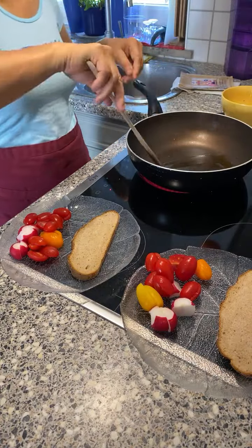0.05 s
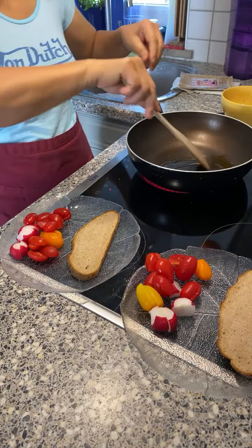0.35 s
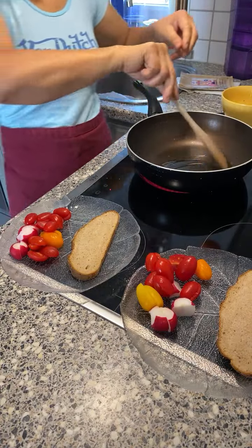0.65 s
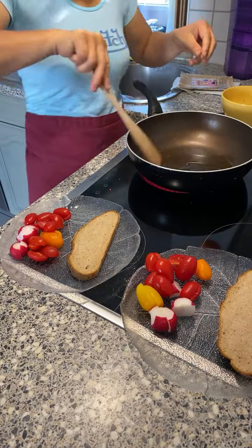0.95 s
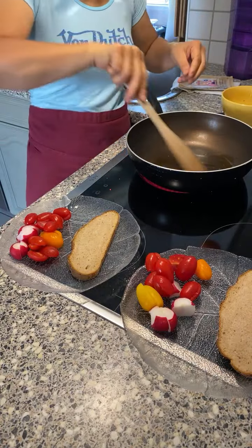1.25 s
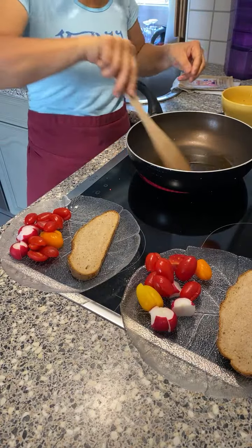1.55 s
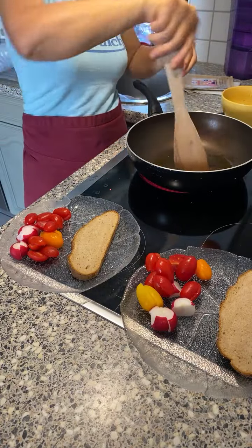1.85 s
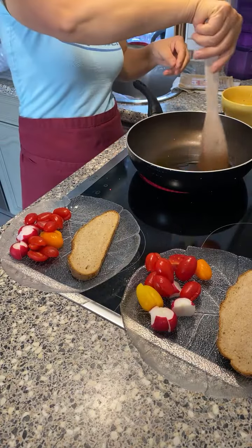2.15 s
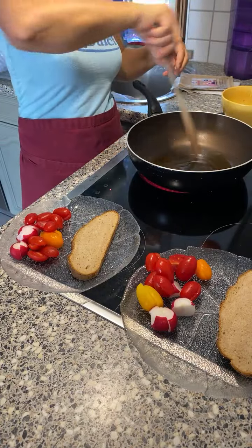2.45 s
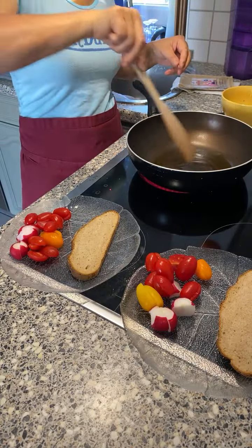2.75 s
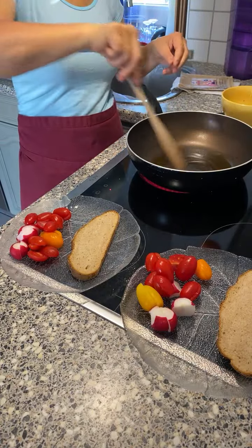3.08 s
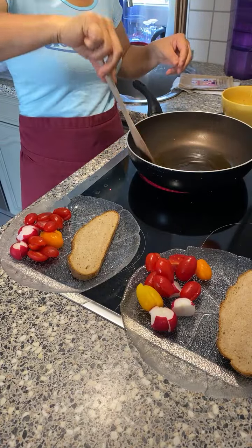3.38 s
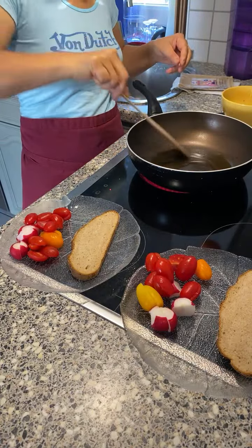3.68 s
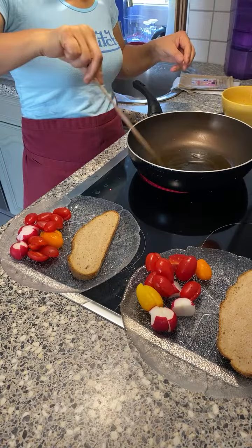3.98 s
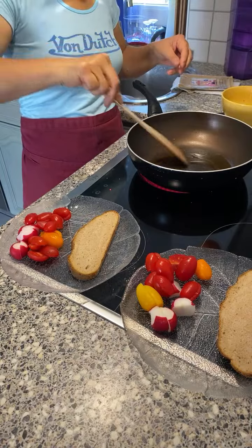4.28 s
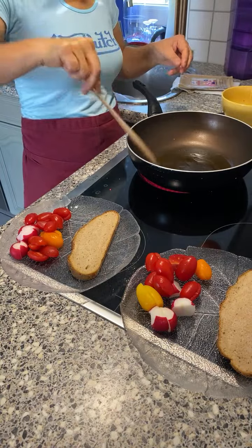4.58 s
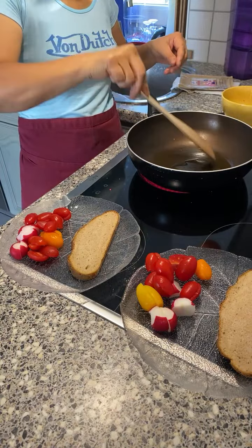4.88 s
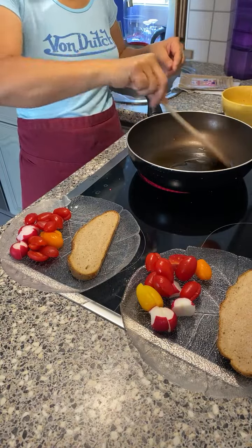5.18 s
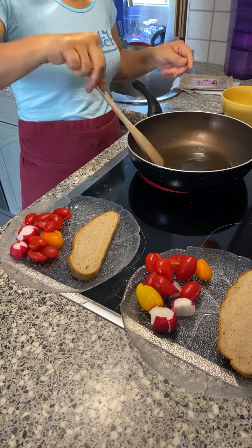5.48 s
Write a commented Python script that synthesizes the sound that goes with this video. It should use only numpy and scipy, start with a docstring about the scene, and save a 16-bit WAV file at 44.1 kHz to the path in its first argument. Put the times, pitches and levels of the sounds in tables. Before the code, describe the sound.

Uneven dry scrapes and occasional taps of a wooden spatula in a frying pan, over a faint appliance hum.

```python
"""A wooden spatula scrapes in strokes over an oiled frying pan, on a glass hob in a small tiled kitchen.
Stick-slip friction makes the rasp and drives the pan's modes; when the blade knocks down, the impact
rings the same modes. Now and then the edge half sticks and squeaks. Reflections from pan, hob and tiles
colour these sounds, and an appliance hums faintly behind them. All is heard in mono."""
import sys
import numpy as np
from scipy import signal
from scipy.fft import rfft, irfft, next_fast_len
from scipy.io import wavfile
from scipy.ndimage import map_coordinates

SR = 44100
rng = np.random.default_rng(int(sys.argv[2]) if len(sys.argv) > 2 else 0)


def generate_wav(sig):
    """Save sig (samples, or channels by samples) to the path in sys.argv[1] as 16-bit PCM at SR."""
    pcm = np.round(np.clip(np.atleast_2d(sig).T, -1, 1) * 32767).astype(np.int16)
    wavfile.write(sys.argv[1], SR, pcm)


N = 243873


def amp(db):
    """Amplitude ratio of a level in decibels."""
    return 10 ** (np.asarray(db) / 20)


def unit(x):
    """Normalisation to rms 1."""
    return x / np.sqrt(np.mean(x ** 2) + 1e-20)


def along(points, hz):
    """Interpolation of (frequency_hz, value) points on a logarithmic frequency axis."""
    f, v = np.transpose(points)
    return np.interp(np.log(hz + 1), np.log(f + 1), v)


def wobble(rate_hz):
    """Random modulation: a spline through rate_hz Gaussian values a second."""
    at = np.arange(N) * rate_hz / SR
    coarse = at[::20]
    return np.interp(at, coarse, map_coordinates(rng.standard_normal(int(at[-1]) + 2), [coarse]))


def filtered(x, response):
    """Linear filtering: the spectrum of x times a complex frequency response."""
    n = x.shape[-1]
    m = next_fast_len(n + SR // 10)
    return irfft(rfft(x, m) * response(np.fft.rfftfreq(m, 1 / SR)), m)[..., :n]


def coloured(x, spectrum):
    """Spectral shaping of x by (frequency_hz, gain_db) points, at rms 1."""
    return unit(filtered(x, lambda hz: amp(along(spectrum, hz))))


def lowpass(hz, edge_hz):
    """Response of a causal two-pole low-pass."""
    return 1 / (1 + np.sqrt(2) * 1j * hz / edge_hz - (hz / edge_hz) ** 2)


def add(track, start_s, x):
    """Superposition of x on the track from start_s on."""
    part = track[max(round(start_s * SR), 0):][:len(x)]
    part += x[:len(part)]


# Spectrum of the still kitchen: frequency_hz, relative_density_db
AIR_SPECTRUM = [(18, -52), (30, -29), (69, -4), (111, -4), (160, -4.5), (292, -9.5), (341, -9.5),
                (830, -15.5), (1440, -20.5), (15500, -35.5)]


def background(hum_hz=99.2, hum_db=-71, air_db=-67.5):
    """Ambient noise and an appliance's hum, a tone slightly modulated in phase and amplitude."""
    phase = 2 * np.pi * hum_hz * np.arange(N) / SR + .5 * wobble(5.2)
    hum = amp(hum_db + 2.0 * wobble(4.7)) * np.sqrt(2) * np.sin(phase)
    return hum + amp(air_db) * coloured(rng.standard_normal(N), AIR_SPECTRUM)


# Reverberation time of the kitchen: frequency_hz, t60_s
KITCHEN_DECAY = [(90, 0.58), (260, 0.15), (800, 0.27), (2000, 0.3), (6000, 0.26), (14000, 0.21)]


def in_kitchen(x, wet_db, early_db, early_t60_s=0.097, glance_db=-13):
    """Convolution with a fresh impulse response: direct sound, echoes off pan, hob and tiles, a tail."""
    hz, t, noise = signal.stft(rng.standard_normal(SR * 3 // 4), SR, nperseg=256)
    decay = amp(-60 * t / along(KITCHEN_DECAY, hz)[:, None])
    tail = signal.istft(noise * decay, SR, nperseg=256)[1]
    t = np.arange(len(tail)) / SR
    tail *= 1 - np.exp(-t / 0.014)
    early = rng.standard_normal(len(t)) * amp(-60 * t / early_t60_s) * (t > .002)
    response = amp(wet_db) * tail / np.linalg.norm(tail) + amp(early_db) * early / np.linalg.norm(early)
    response[0] += 1
    response /= np.linalg.norm(response)
    # only short waves glance off the pan's wall, combing the treble
    for delay_s in rng.uniform(.0006, .004, size=4):
        add(response, delay_s, amp(glance_db) * np.array([1, -1]))
    return signal.fftconvolve(x, response)


# Whistles of the half-sticking edge: middle_s, length_s, pitch_hz, relative_level_db
EDGE_SQUEAKS = [(0.813, 0.083, 4400, -55.5), (0.947, 0.16, 4470, -53), (1.147, .07, 5230, -58),
                (1.332, .08, 4950, -54), (1.541, 0.059, 4260, -52), (3.556, 0.12, 4120, -59.5)]


def squeaks(gain_db, width_hz, sag):
    """Stick-slip oscillation: hoarse narrow-band tones that sink a little as the blade slows."""
    out = np.zeros(N)
    for middle_s, length_s, pitch_hz, level_db in EDGE_SQUEAKS:
        u = np.linspace(-1, 1, int(length_s * SR))
        phase = 2 * np.pi * np.cumsum(pitch_hz * (1 - sag * u)) / SR
        hoarse = filtered(rng.standard_normal((2, len(u))), lambda hz: lowpass(hz, width_hz / 2))
        tone = unit(hoarse[0] * np.sin(phase) + hoarse[1] * np.cos(phase))
        add(out, middle_s - length_s / 2, amp(level_db + gain_db) * np.cos(np.pi / 2 * u) * tone)
    return in_kitchen(out, wet_db=-27.0, early_db=-5)[:N]


def resonate(force, hz, width_hz):
    """Resonance of one mode, a damped harmonic oscillator."""
    return signal.lfilter(*signal.iirpeak(hz, hz / width_hz, fs=SR), force)


# Range of modes in which each part moves: from_hz, to_hz
HOB, BODY, BOTTOM, WALL, RIM = (0, 110), (110, 660), (660, 1450), (1450, 2000), (2000, 7000)
# Modes of the pan standing on the hob: frequency_hz, bandwidth_hz, relative_level_db
PAN_MODES = [(83.2, 6, 3), (135.3, 9.2, 8), (196.6, 46, -4), (314.6, 26, 5), (374.4, 53, 6),
             (448.3, 54, 3.5), (577, 96, -1), (734.6, 6.6, 0.5), (836.4, 45.5, 4.5), (1091, 58, -4.5),
             (1315, 310, -6), (1567, 18, -1), (1665, 45, 9.5), (1813, 79, 3.5), (2540, 60, -3.5),
             (2906, 276, 10.5), (2760, 55, -16), (4080, 67, 4), (7000, 18, -14)]


def struck_pan(force, thump_db, bottom_db):
    """Modal superposition: the point of contact sets how strongly, and in what sign, modes are driven."""
    ring = np.zeros(len(force))
    for hz, width_hz, db in PAN_MODES:
        coupling_db = thump_db * (hz < HOB[1]) + bottom_db * (BOTTOM[0] < hz < BOTTOM[1])
        ring += rng.choice([-1, 1]) * amp(db + coupling_db) * resonate(force, hz, width_hz)
    return ring


def rubbed_pan(force, part, drift_db):
    """Forced vibration of one part; each mode waxes and wanes at random as the blade crosses its nodes."""
    modes = [amp(db + drift_db * wobble(9.7)) * resonate(force, hz, width_hz)
             for hz, width_hz, db in PAN_MODES if part[0] < hz < part[1]]
    return unit(signal.lfilter(*signal.butter(2, part[1], fs=SR), sum(modes)))


# Spectrum of wood rubbing on the coating: frequency_hz, relative_density_db
RASP_SPECTRUM = [(200, -20.5), (600, 5.5), (1400, -3), (2100, 5), (2800, -6.5), (3400, 1.5), (4350, 3),
                 (5300, -0.5), (7000, -3.5), (9000, -13), (16000, -25)]


def wood_rasp(force):
    """Source and filter: a broadband force takes on the colour of wood on the coating."""
    return coloured(force, RASP_SPECTRUM)


# Landings of the blade: start_s, relative_level_db, contact_s, crack_db, hob_thump_db, bottom_ring_db
BLADE_KNOCKS = [(.502, -54.5, 0.00069, -7, 0, 1), (1.927, -37.5, 0.00087, -14, -8, -4),
                (1.981, -40, 0.00084, -14, -10, -3.5), (2.965, -36, 0.0016, -26.5, 0.5, 3),
                (3.022, -43.5, 0.00072, -2, -11, 1), (3.410, -41, 0.00066, -10.5, 0.5, 0),
                (4.070, -36.5, 0.00046, -14, 0.5, -2), (4.080, -44, 0.0004, -13, -4, 11),
                (4.559, -40, 0.00057, -12, -4, 3), (4.621, -44.5, 0.00017, 0.5, 10.5, -16),
                (5.148, -31, 0.00068, -12.5, 3, 6), (5.23, -36.5, 0.00039, -6, 7.5, 5)]


def knocks(gain_db, crack_t60_s, spread_s):
    """Impact: a half-sine push rings the pan, duller the longer the contact, with a gritty crack."""
    out, t = np.zeros(N), np.arange(SR // 2) / SR
    for start_s, level_db, contact_s, crack_db, thump_db, bottom_db in BLADE_KNOCKS:
        push = np.sin(np.pi * t / contact_s) * (t < contact_s)
        ring = struck_pan(push, thump_db, bottom_db)
        ring *= 1 - np.exp(-t / spread_s)  # bending waves take a moment to spread through the pan
        ring /= np.std(ring[:SR // 50])  # rms 1 over the first 20 ms
        crack = wood_rasp(rng.standard_normal(len(t))) * amp(crack_db - 60 * t / crack_t60_s)
        add(out, start_s, amp(level_db + gain_db) * in_kitchen(ring + crack, wet_db=4.0, early_db=1.0))
    return out


def friction(chatter_db, slip_rate_hz=14000):
    """Stick-slip force: wood fibres catch and let go in dense, tiny impulses that come in clumps."""
    slips = rng.random(N) < slip_rate_hz / SR
    impulses = slips * rng.standard_normal(N)
    clumping = amp(chatter_db * (wobble(170) + 1.46 * wobble(45)))
    return unit(impulses * clumping)


# How each layer follows a stroke: speed_power, slowing_power, change_over_stroke_db (its swell or fade),
# outward_db (a further change as the blade heads for the wall)
LAYER_LAWS = {"rasp": (0.92, 1.15, 5, -1), "sheen": (1.3, 1.15, 1.5, -16), "bottom": (1.4, 0.73, 7.2, 8.7),
              "wall": (0.98, 0.95, 4, 19.5), "judder": (0.25, 0.52, -3, 14.5)}
# Pushes of the blade: start_s, rise_s, hold_s, fall_s, heading (-1 to the centre, 1 to the wall),
# relative_level_db, then offsets from that level: sheen_db, bottom_db, wall_db, judder_db
BLADE_STROKES = [ (0.0, 0.0016, 0.02, 0.12, 0, -55.5, -16, -6, 7, -3.5),
                 (0.082, 0.1, 0.0091, .19, -0.46, -55.5, -12.5, -4, -4, -6),
                 (0.502, 0.018, 0.096, 0.16, -0.63, -75, -8, -7, -3, 4),
                 (0.71, 0.13, 0.16, 0.11, 0.62, -52.5, -14.5, -25, 0, -10.5),
                 (1.029, 0.1, 0.086, 0.07, 1, -55, -13.5, -1, -9.5, .5),
                 (1.254, 0.066, 0.098, 0.091, 1, -52, -12, -3.5, -2, -8),
                 (1.482, 0.064, 0.034, .16, 0.23, -50.5, -14.5, -6, -7, -3),
                 (1.96, 0.029, 0.31, 0.093, 0.3, -65.5, -16, 9, 0, 13.5),
                 (2.13, 0.23, 0.17, 0.21, .7, -49, -10.5, -11, -9.5, -9),
                 (3.019, .064, 0.0088, 0.14, -0.056, -50, -17.5, -14, -5.5, -7),
                 (3.419, 0.19, 0.063, 0.16, 0.14, -56, -8, -11, -5, -2.5),
                 (4.127, 0.11, 0.023, 0.15, .1, -53, -14.5, -4.5, -6, -5.5),
                 (4.413, 0.077, 0.13, 0.062, -0.68, -73, -12, 0, -5, 1),
                 (4.62, 0.022, 0.055, .216, -0.72, -51.5, -11.5, -2, -8.5, -7.5),
                 (5.23, .003, 0.13, 0.14, -0.72, -51.5, -14, -6, -3.5, -6.5), ]


def stroke_gains(bite_s=0.00099, lean_s=0.026, bite_speed=0.1, push_power=1.15, slow_power=1.42):
    """Power laws tie each layer's amplitude to sliding speed; near the wall, more ring and less hiss."""
    gains = np.zeros((5, N))
    for start_s, rise_s, hold_s, fall_s, heading, stroke_db, *offsets_db in BLADE_STROKES:
        t = np.arange(int((rise_s + hold_s + 2 * fall_s) * SR)) / SR
        speed = bite_speed + (1 - bite_speed) * np.minimum(t / rise_s, 1) ** push_power  # full speed is 1
        slowing = amp(-25.5 * (np.maximum(t - rise_s - hold_s, 0) / fall_s) ** slow_power)
        progress = np.minimum(t / (rise_s + hold_s + fall_s), 1) - .5
        for gain, offset_db, layer in zip(gains, [0, *offsets_db], LAYER_LAWS):
            speed_power, slowing_power, change_over_stroke_db, outward_db = LAYER_LAWS[layer]
            # the blade bites at once, but judder builds only as the hand leans on it
            contact = np.minimum(t / (lean_s if layer == "judder" else bite_s), 1)
            level_db = stroke_db + offset_db + (change_over_stroke_db + heading * outward_db) * progress
            add(gain, start_s, contact * speed ** speed_power * slowing ** slowing_power * amp(level_db))
    return gains


# Spectrum of the blade's high hiss: frequency_hz, relative_density_db
SHEEN_SPECTRUM = [(4000, -28), (7500, -3), (9500, -4.5), (12000, -10.5), (16000, -17.5)]


def scraping(rasp_db, sheen_db, bottom_db, wall_db, rim_db, judder_db, drift_db):
    """Sliding friction hisses at the blade, rings bottom, wall and rim, and shakes the whole pan."""
    rasp, sheen, bottom, wall, judder = stroke_gains()
    force = friction(chatter_db=0.94)
    direct = amp(rasp_db) * rasp * wood_rasp(force)
    direct += amp(sheen_db) * sheen * coloured(friction(chatter_db=0.6), SHEEN_SPECTRUM)
    direct += amp(judder_db) * judder * rubbed_pan(force, BODY, drift_db)
    direct += amp(bottom_db) * bottom * rubbed_pan(force, BOTTOM, drift_db)
    direct += amp(wall_db) * wall * rubbed_pan(force, WALL, drift_db)
    direct += amp(rim_db) * np.sqrt(wall * rasp) * rubbed_pan(force, RIM, drift_db)
    # the echoes change as the blade travels round the pan: crossfade to new ones every 0.2 s
    out, hop = np.zeros(N), SR // 5
    for centre in range(0, N + hop, hop):
        at = np.arange(max(centre - hop, 0), min(centre + hop, N))
        piece = direct[at] * np.cos(np.pi / 2 * (at - centre) / hop)
        add(out, at[0] / SR, in_kitchen(piece, wet_db=-6.5, early_db=-4.0))
    return out


def scene():
    """Superposition of all sources, the same in both channels."""
    mix = scraping(rasp_db=1.08, sheen_db=0.5, bottom_db=-5.0, wall_db=-1, rim_db=-5,
                   judder_db=-2.5, drift_db=2.5)
    mix += squeaks(gain_db=0.5, width_hz=220, sag=0.0203)
    mix += knocks(gain_db=-2.5, crack_t60_s=0.058, spread_s=0.0022)
    mix += background()
    return np.array([mix, mix])


def record(dry, gap_s=(4.0762, 4.0798), tick_s=4.1, tick_db=-45, bass_hz=42, top_hz=15800):
    """Gating and band limiting: an instant of silence, then a tick; deep bass thinned, top treble cut."""
    t = np.arange(N) / SR
    gate = (t < gap_s[0]) | (t > gap_s[1])
    tick = amp(tick_db) * (np.arange(N) == round(tick_s * SR))
    return filtered(dry * gate + tick, lambda hz: (hz < top_hz) * hz ** 2 / np.hypot(hz ** 2, bass_hz ** 2))


dry = scene()
out = record(dry)
generate_wav(out)
```